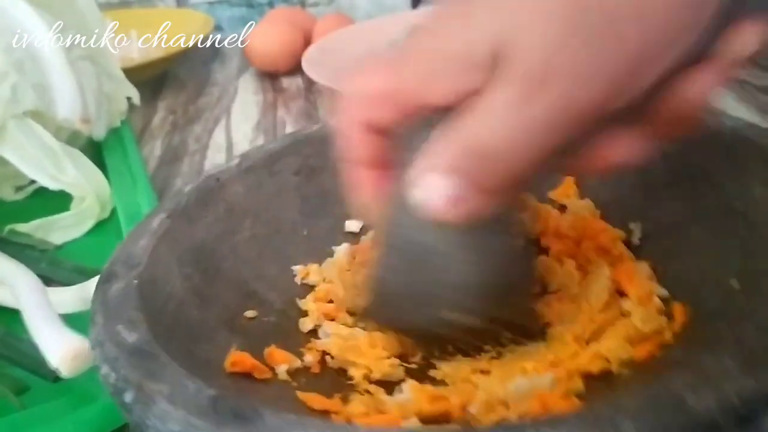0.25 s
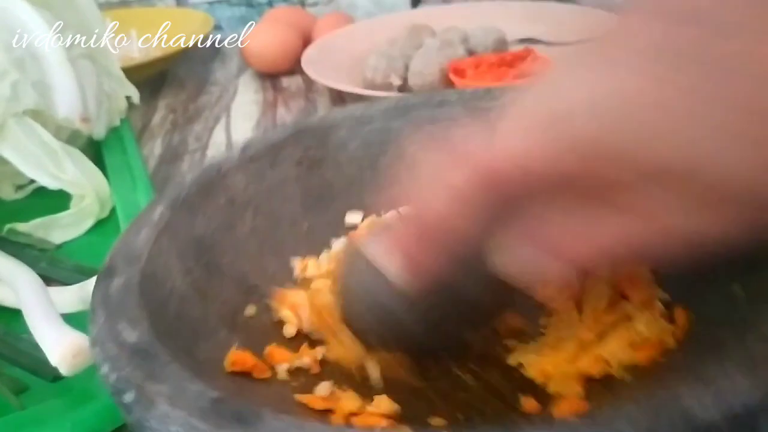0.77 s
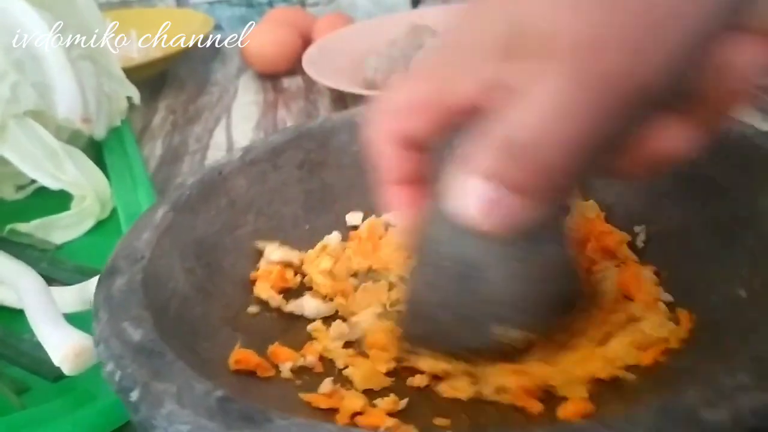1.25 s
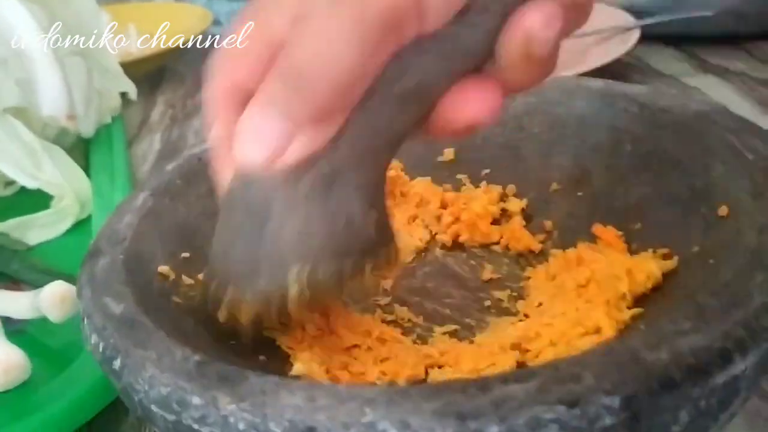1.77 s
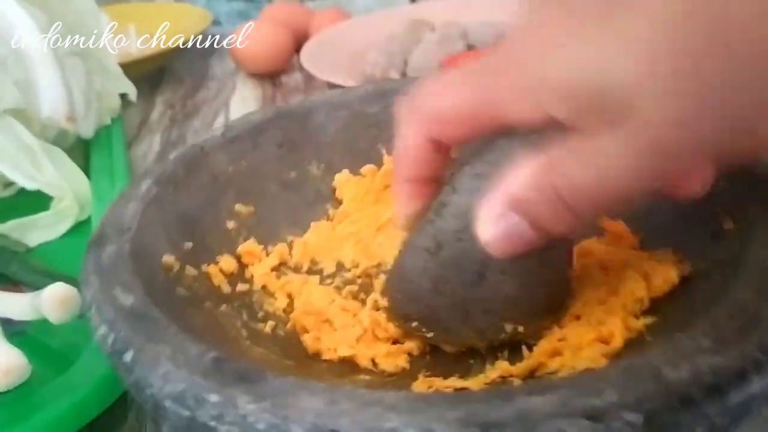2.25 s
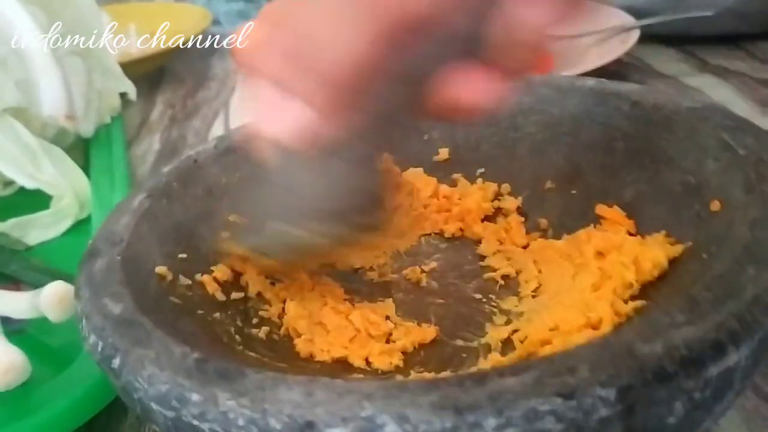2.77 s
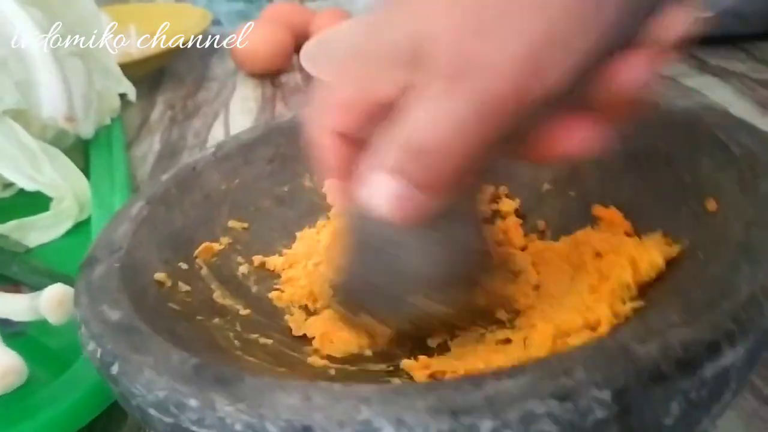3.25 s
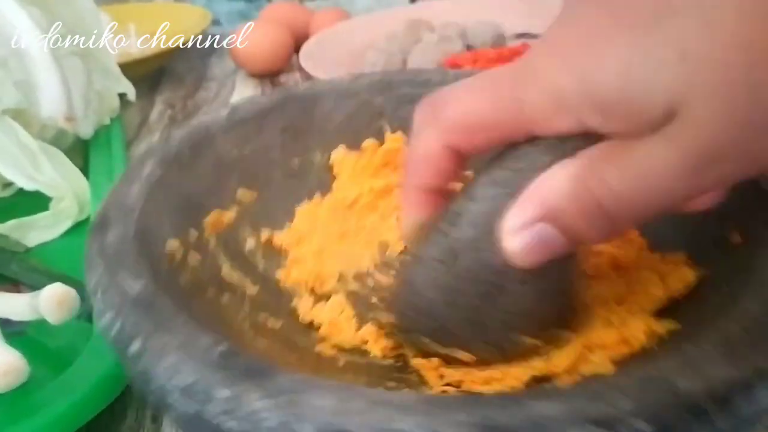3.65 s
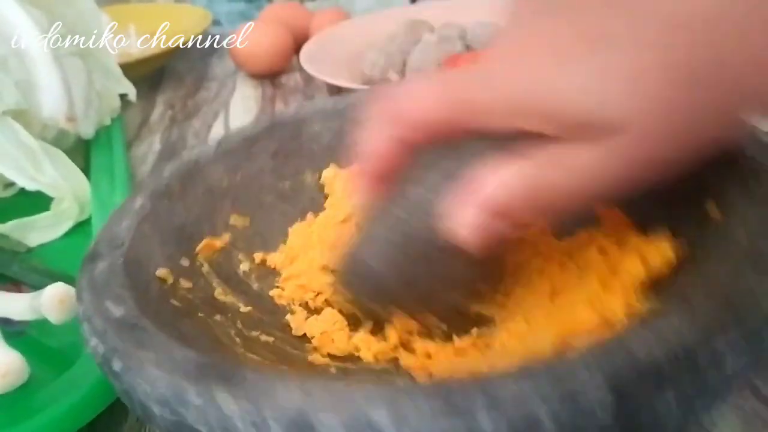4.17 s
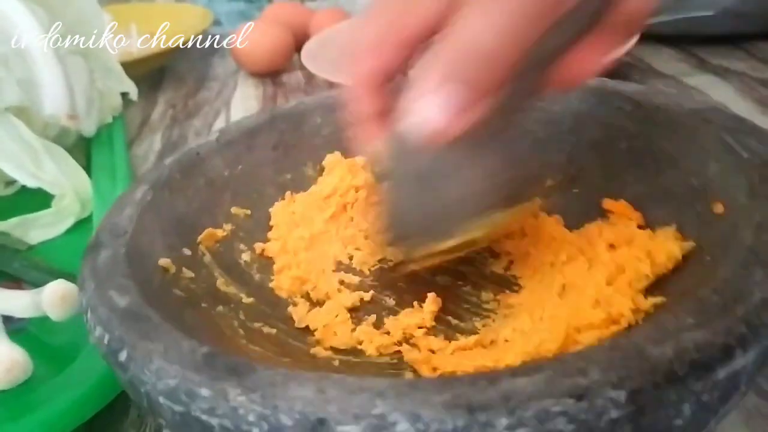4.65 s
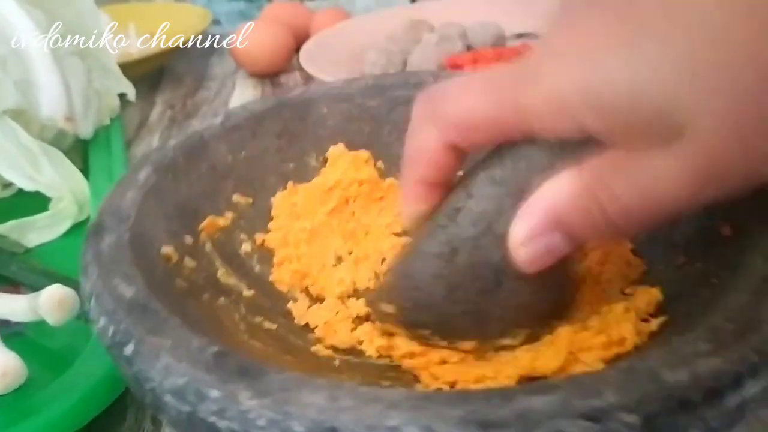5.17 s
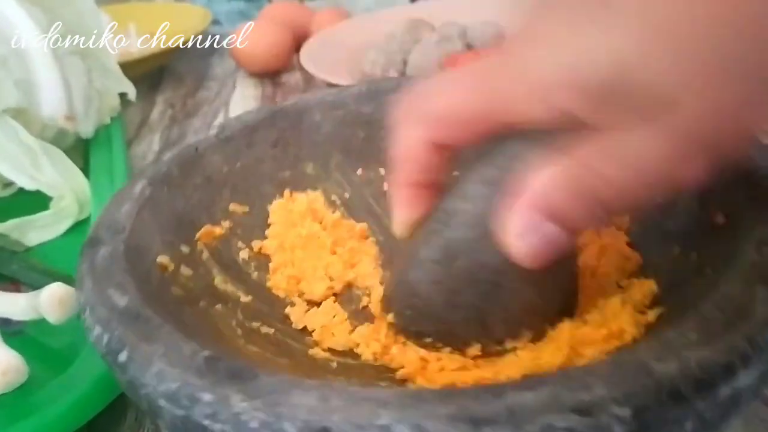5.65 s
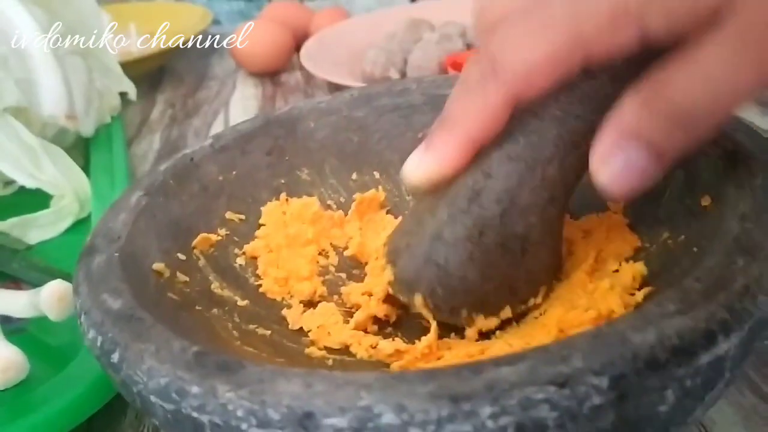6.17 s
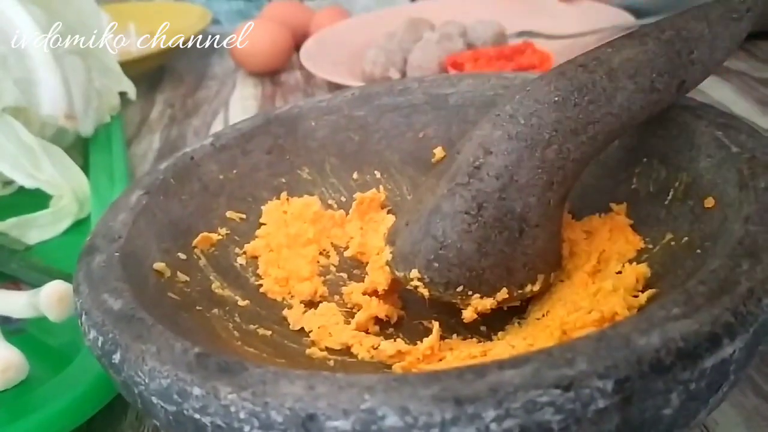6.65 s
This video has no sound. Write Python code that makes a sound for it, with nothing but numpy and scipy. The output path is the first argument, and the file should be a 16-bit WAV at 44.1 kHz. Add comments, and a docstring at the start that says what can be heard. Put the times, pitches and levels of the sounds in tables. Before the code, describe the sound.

A stone pestle grinds moist spice paste in a stone mortar, heard from close by in a kitchen. At the start a faint ring of the bowl fades as quick, grainy rasping strokes begin, several a second, dotted with crisp snaps of grit. The table rumbles and thuds softly beneath them. At about 0.7 seconds the pestle hits bare stone with a sharp, briefly ringing knock, and a faint low hum passes around 1 second. Lighter taps follow near 1.8 seconds. The scraping and crackling carry on unevenly, with dull bumps around 3 seconds. More sharp knocks land at about 3.9 and 5.4 seconds, each with a short echo from the hard walls, and a low table thump falls between them near 4.9. The strokes thin out by 6 seconds, and a last ringing knock at 6.2 dies away into faint rumble and hiss.

```python
"""A stone pestle grinds moist spice paste in a stone mortar on a kitchen table, close to two microphone ports.
At first a ring of the bowl fades over a faint hiss; friction makes the paste rasp, grit snaps and the
table thuds and rumbles. Around the first second a low hum passes and the pestle knocks on bare stone:
the bowl rings, and faint treble distortion tones follow the ring. Strokes and scattered knocks go on,
echoed by the hard kitchen walls, until a last knock just after six seconds dies away into the rumble."""
import sys
import numpy as np
from scipy import signal
from scipy.fft import rfft, irfft, next_fast_len
from scipy.io import wavfile
from scipy.ndimage import uniform_filter1d, map_coordinates

SR = 44100
rng = np.random.default_rng(int(sys.argv[2]) if len(sys.argv) > 2 else 0)


def bounce(signal):
    """Save signal as a 16-bit WAV file at the path given by the first command-line argument."""
    frames = np.transpose(np.atleast_2d(signal))
    limited = np.clip(frames, -1, 1)
    pcm = np.round(limited * 32767).astype(np.int16)
    wavfile.write(sys.argv[1], SR, pcm)


N = 305168


def amp(db):
    """Amplitude ratio of a level in decibels."""
    return 10 ** (np.asarray(db) / 20)


def unit(x):
    """Normalisation to an rms of 1."""
    return x / np.sqrt(np.mean(x ** 2) + 1e-20)


def along(points, hz):
    """Interpolation of (Hz, value) points on a logarithmic frequency axis."""
    freqs, values = np.transpose(points)
    return np.interp(np.log(hz + 1), np.log(freqs + 1), values)


def wobble(rate):
    """Smooth random modulation through rate knots a second."""
    knots = rng.standard_normal(int(N * rate / SR) + 4)
    return map_coordinates(knots, [np.arange(N) * rate / SR])


def filtered(x, response):
    """Linear filtering: the spectrum is multiplied by a frequency response."""
    size = next_fast_len(x.shape[-1] + 8192)
    return irfft(rfft(x, size) * response(np.fft.rfftfreq(size, 1 / SR)), size)[..., :x.shape[-1]]


def add(track, start, sound):
    """Superposition of a sound on a track, from start in seconds."""
    part = track[..., round(start * SR):][..., :sound.shape[-1]]
    part += sound[..., :part.shape[-1]]


def swells(peaks, levels, lengths, ends_db=-10, exponent=1.9, release_ratio=0.95):
    """Incoherent addition: the envelope of swells whose powers sum."""
    power, t = np.zeros(N), np.arange(N) / SR
    for peak, db, length in zip(peaks, levels, lengths):
        near = slice(max(0, round((peak - 2 * length) * SR)), round((peak + 2 * length) * SR))
        offset = (t[near] - peak) / (length / 2)
        distance = np.where(offset < 0, -offset, offset / release_ratio)
        power[near] += amp(db + ends_db * distance ** exponent) ** 2
    return np.sqrt(power)


# Each row: frequency in Hz, correlation between the ports.
COHERENCE = [(30, 0.53), (80, 1), (200, 0.9), (500, 0.4), (2000, 0.42), (8000, 0.034)]

def stereo_noise(spectrum, pair):
    """Partial coherence: two independent noises are coloured and blended into stereo of rms 1."""
    def response(hz):
        angle = np.arccos(np.clip(along(COHERENCE, hz), -1, 1)) / 2
        return amp(along(spectrum, hz)) * [np.cos(angle), np.sin(angle)]
    mid, side = filtered(pair, response)
    return unit(np.array([mid + side, mid - side]))


# Each row: frequency in Hz, relative spectral level in dB.
HISS_SPECTRUM = [(400, -32.5), (600, -1), (2000, -9), (5000, -15.5), (9500, -12.5), (12000, -23),
                 (16300, -28.5)]

def hiss(db=-65.5):
    """Stationary broadband noise forms a faint floor."""
    return amp(db) * stereo_noise(HISS_SPECTRUM, rng.standard_normal((2, N)))


# Each row: frequency in Hz, time of peak in seconds, level in dB, length in seconds.
HUM_TONES = [(48.4, .8, -52, .8), (95, .8, -60, 1), (339, 1.2, -56.5, 0.45)]

def hum():
    """Phase modulation makes low tones waver as they come and go."""
    t = np.arange(N) / SR
    return sum(swells([peak], [db], [length]) * np.sqrt(2) * np.sin(2 * np.pi * hz * t + .8 * wobble(14))
               for hz, peak, db, length in HUM_TONES)


# Each row: frequency in Hz, reverberation time (60 dB of decay) in seconds.
KITCHEN_T60 = [(300, 0.42), (1600, 0.95), (4000, 0.66), (10000, 0.44)]

def kitchen(x):
    """Reverberation: wall reflections build up, then each frequency decays at its own rate."""
    hz, t, noise = signal.stft(rng.standard_normal((2, SR)), SR, nperseg=256)
    decay = amp(-60 * t / along(KITCHEN_T60, hz)[:, None])
    tail = signal.istft(noise * decay * (1 - np.exp(-t / 0.032)), SR, nperseg=256)[1]
    return signal.fftconvolve(x[None], tail / np.linalg.norm(tail[0]), axes=1)


# Each row: time in seconds, then levels in dB of the sway, the board and its upper band.
RUMBLE_LEVELS = [(0.0, -50, -60, -56.5), (0.4, -50, -52.5, -56.5), (0.98, -54.5, -57, -55),
                 (1.41, -53.5, -52.5, -56.5), (1.66, -53.5, -55, -61), (2.33, -56.5, -63, -67),
                 (2.93, -55.5, -61.5, -64.5), (3.16, -53, -45, -50.5), (3.49, -55, -64, -63),
                 (4.07, -54, -57, -68.5), (4.57, -57.5, -61.5, -61), (4.87, -54.5, -56.5, -61),
                 (5.72, -55, -61.5, -63), (6.11, -58, -59, -63.5), (6.44, -59, -62, -63),
                 (6.92, -62, -61, -68)]
# Each row of these three: frequency in Hz, relative spectral level in dB.
SWAY_SPECTRUM = [(12, -31), (20, 2), (49, -7), (80, -9.5), (124, -19.5), (140, -26), (180, -51.5),
                 (310, -120)]
BOARD_SPECTRUM = [(76, -43.5), (130, -29.5), (156, -8.5), (210, -4.5), (247, -7), (300, -24), (390, -47.5),
                  (660, -120)]
UPPER_SPECTRUM = [(250, -35.5), (300, -1), (345, -1.5), (420, -2), (550, -5), (900, -24.5), (1500, -37)]

def table_rumble():
    """Forced vibration: the table sways and its board drones under the working hands."""
    def band(spectrum, levels, waver_db, rate):
        db = np.interp(np.arange(N) / SR, times, levels) + waver_db * wobble(rate)
        return amp(db) * stereo_noise(spectrum, rng.standard_normal((2, N)))
    times, sway_db, board_db, upper_db = np.transpose(RUMBLE_LEVELS)
    sway = band(SWAY_SPECTRUM, sway_db, waver_db=3.3, rate=16)
    board = band(BOARD_SPECTRUM, board_db, waver_db=3.3, rate=13)
    return sway + board + band(UPPER_SPECTRUM, upper_db, waver_db=1.4, rate=11)


# Each row: start in seconds, level in dB, frequency in Hz, cycles to decay by 30 dB.
ARM_PUSHES = [(0.691, -27, 96, 5.3), (1.6, -42, 78, 6.4), (2.029, -35.5, 90, 5.4), (2.274, -50, 72.7, 7.6),
              (2.649, -38.5, 91.7, 6.6), (2.926, -37, 80.7, 7.1), (3.178, -30, 117, 6.8),
              (3.367, -44, 80.7, 5), (3.668, -39, 65.2, 4.7), (3.89, -43, 89.7, 3.1), (4.149, -51, 56.5, 4),
              (4.479, -44, 101, 7.2), (4.899, -24, 95.6, 11.3), (5.1, -63.5, 44.2, 3.1),
              (5.464, -34, 86, 3.9), (5.752, -35, 91, 4.4), (6.178, -37, 65.7, 5)]

def table_shoves():
    """Damped oscillation: each push of the arms swings the table on its flexing legs."""
    out, t = np.zeros((2, N)), np.arange(SR // 3) / SR
    for start, db, hz, cycles in ARM_PUSHES:
        envelope = amp(db - 30 * t * hz / cycles) * (1 - np.exp(-t / 0.013))
        add(out, start, envelope * np.sin(2 * np.pi * hz * t))
    return out


# Each row: start in seconds, level in dB, frequency in Hz, relative rattle level in dB.
MORTAR_BUMPS = [(0.089, -39, 200, -10), (0.299, -38.5, 223, -19.5), (0.664, -23.5, 497, -4),
                (1.149, -42.5, 345, -9.5), (1.516, -35, 417, -6), (1.799, -38.5, 185, -4),
                (2.974, -37.5, 175, -2.5), (3.024, -37.5, 220, -8.5), (3.099, -47.5, 188, -10.5),
                (3.155, -30.5, 191, -2.5), (3.199, -30.5, 510, -17), (3.719, -44, 207.6, -15),
                (3.87, -20, 604, -6), (3.909, -29, 573, -3.5), (3.939, -37.5, 610, -8.5),
                (4.689, -46, 187.6, -14.5), (4.759, -45, 207, -18.5), (4.959, -34.5, 198, -8),
                (5.44, -22.5, 558, -8.5), (5.969, -41.5, 201, -21), (6.164, -36, 496, -3)]

def table_thuds():
    """Impact excitation: the rocking mortar bumps the board, which swings with a dull rattle."""
    out, t = np.zeros((2, N)), np.arange(SR // 3) / SR
    rattle_spectrum = [(150, -14.0), (300, -3.5), (600, -0.5), (1300, -13.5), (2500, -22.0)]
    for start, db, hz, rattle_db in MORTAR_BUMPS:
        swing = np.sin(2 * np.pi * hz * t) * amp(-60 * t * hz / 25)  # 60 dB down in 25 cycles
        noise = stereo_noise(rattle_spectrum, rng.standard_normal((2, len(t))))
        rattle = amp(rattle_db - 60 * t / 0.14) * noise
        add(out, start, amp(db) * (swing + rattle) * (1 - np.exp(-t / 0.00053)))
    return out


# Each row: start in seconds, level in dB, relative body level in dB.
FRACTURES = [(0.0713, -40.5, -18), (0.2413, -30, -27.5), (0.3526, -37.5, -23), (0.663, -27, -19),
             (0.8315, -27.5, -10), (1.0953, -26, -5), (1.292, -33.5, -22), (1.777, -36, -11),
             (2.031, -31.5, -28), (2.1029, -32.5, -21), (2.2792, -35.5, -10), (2.312, -26.5, -32),
             (2.4025, -26.5, -34), (2.4079, -36, -35), (2.584, -32, -13), (2.6713, -35, -18),
             (2.86, -35.5, -17.5), (3.3071, -35, -33), (3.3699, -25, -12.5), (3.609, -29.5, -34),
             (3.703, -32.5, -32.5), (3.869, -29, -20.5), (4.5336, -38.5, -10.5), (4.9902, -37, -19.5),
             (5.1691, -40, -24), (5.439, -25, -19.5), (5.5349, -33.5, -5.5), (5.576, -28, -10),
             (5.6605, -37, -2), (6.131, -46.5, -21), (6.163, -28, -19)]
# Each row: frequency in Hz, relative spectral level in dB.
BURST_SPECTRUM = [(1500, -29), (3500, -16.5), (6000, -8), (9000, 0), (11500, -5), (12500, -11.5),
                  (16300, -20.5)]

def grit_snaps(rise_s=.0004, t60_s=.014):
    """Brittle fracture: a hard grain gives way with a bright burst, a duller body and a short crumble."""
    out, t = np.zeros((2, N)), np.arange(SR // 16) / SR
    body_spectrum = [(600, -36.5), (1100, -3.5), (4200, -3), (6500, -19.5)]
    crumble = amp(-17 - 60 * t / 0.14)
    envelope = (amp(-60 * t / t60_s) + crumble) * (1 - np.exp(-t / rise_s))
    for start, db, body_db in FRACTURES:
        burst = stereo_noise(BURST_SPECTRUM, rng.standard_normal((2, len(t))))
        body = stereo_noise(body_spectrum, rng.standard_normal((2, len(t))))
        add(out, start, amp(db) * (burst + amp(body_db) * body) * envelope)
    return out * amp([[-1.5], [1.5]])  # louder on the right


# Each row: frequency in Hz, level in dB relative to the main ring.
DISTORTION_TONES = [(7467, -52), (8091, -54), (9405, -39), (10050, -45), (10710, -50), (11360, -49),
                    (12650, -48), (13290, -39), (13940, -43), (14600, -46), (15255, -46)]

def distortion_tones(knocks):
    """Amplitude modulation: faint treble distortion tones follow the envelope of loud rings."""
    main_ring = filtered(knocks, lambda hz: np.exp(-((hz - RING_TONES_HZ[0]) / 150) ** 2))
    t = np.arange(N) / SR
    tones = sum(amp(db) * np.sin(2 * np.pi * (hz * t + rng.random())) for hz, db in DISTORTION_TONES)
    return np.abs(signal.hilbert(main_ring)) * tones


# Each row: time of peak in seconds, level in dB, length in seconds, frequency in Hz.
RING_SWELLS = [(0, -41, 0.16, 1618), (0.113, -50.5, .08, 1614), (0.215, -52, 0.11, 1620),
               (0.41, -57.5, 0.13, 1630), (1.38, -54, 0.19, 882), (1.573, -54, 0.13, 1100),
               (1.598, -54, .14, 1630), (1.713, -57, 0.11, 1615), (2.832, -54, 0.12, 1607),
               (3.043, -64, 0.15, 1656), (3.073, -54, .06, 1000), (5.194, -56.5, 0.054, 1624)]

def bowl_resonance(half_width_hz=31):
    """Narrow-band resonance: the bowl's ring fades at the opening, then swells faintly; a few dragging strokes
    add faint narrow tones near 1 kHz."""
    t = np.arange(N) / SR
    slow = filtered(rng.standard_normal((2, 2, N)), lambda hz: 1 / (1 + (hz / half_width_hz) ** 2))
    in_phase, quadrature = unit(slow)
    out = np.zeros((2, N))
    for peak, db, length, hz in RING_SWELLS:
        band = in_phase * np.cos(2 * np.pi * hz * t) + quadrature * np.sin(2 * np.pi * hz * t)
        out += swells([peak], [db], [length]) * band
    return out


# Each entry: frequency in Hz of a tone heard in each knock's ring.
RING_TONES_HZ = [1624, 2270, 2615, 3708, 5515, 6130]
# Each row, one per ring tone: relative level in dB, 60 dB decay time in seconds.
RING_DECAYS = [(-2.5, 0.11), (-30, 0.14), (-39, .1), (-13, 0.072), (-29.5, 0.35), (-23, 0.15)]
# Brief high tones at a knock's start. Each row: frequency in Hz, level in dB, 60 dB decay in seconds.
SHORT_HIGH_TONES = [(4850, 0, .035), (6840, -6, .03)]
# Air and paste in the bowl: frequency in Hz, 60 dB decay time in seconds.
CAVITY_MODE = (1050, .04)
# Each row: frequency in Hz, relative spectral level in dB.
CONTACT_SPECTRUM = [(200, -16.5), (450, -11.5), (700, -4.5), (1100, 5), (1900, 4), (2800, 4), (3400, -10.5),
                    (4200, -14.5), (8000, -24.5), (16000, -33.5)]
# Each row: start in seconds, level in dB, then gains in dB of the fourth ring tone, top two ring tones, # brief
# high tones, click, crack and cavity, and last the pan to the left in dB.
BLOWS = [(0.6622, -2, -2, -4, -6, -28, 3.5, -14.5, -6.5), (0.676, -24, 10.5, 0, -19, -20.5, 8.5, -9, 2.5),
         (1.5249, -52, 13.5, 20, -7, 11, 1, 12, -3.5), (1.7771, -20.5, 3.5, 0.5, -9, -41, -8, -8.5, 4.5),
         (1.8433, -36.5, 6, 16, -1.5, -15.5, 7.5, 2, 6), (3.8684, -2, -1.5, 1, -29, -36, -4.5, -21.5, 4.5),
         (4.7091, -42, -5, 14.5, -20.5, 18, -25, -28.5, -5.5),
         (5.437, -3, 7, 0.5, -28, -32.5, -2, -24.5, -5),
         (6.1621, -4.5, -2.5, -2.5, -52.5, -28.5, -4.5, -46, -8)]

def pestle_knocks(rise_s=0.0004):
    """Damped free vibration: stone strikes stone with a click and a crack, and the ring decays."""
    out, t = np.zeros((2, N)), np.arange(SR // 3) / SR
    rim_shadow = lambda hz: amp(along([(1700, 3), (2500, -6), (6000, -3.5), (12000, -7)], hz))
    def tone(hz, db, t60):
        drift = (hz / 13000) ** 3 * np.cumsum(rng.standard_normal(len(t)))  # blurs the high tones
        return amp(db - 60 * t / t60) * np.sin(2 * np.pi * hz * t + drift)
    for start, db, fourth_db, top_db, short_high_db, click_db, crack_db, cavity_db, pan_db in BLOWS:
        short_high = sum(tone(hz, level + short_high_db, t60) for hz, level, t60 in SHORT_HIGH_TONES)
        ring = tone(CAVITY_MODE[0], cavity_db, CAVITY_MODE[1])
        gains = [0, 0, 0, fourth_db, top_db, top_db]  # each blow has its own timbre
        for hz, (level, t60), gain_db in zip(RING_TONES_HZ, RING_DECAYS, gains):
            ring += tone(hz, level + gain_db, t60)
        contact = unit(filtered(rng.standard_normal(len(t)), lambda hz: amp(along(CONTACT_SPECTRUM, hz))))
        crack = amp(crack_db) * contact * (amp(-60 * t / 0.0079) + amp(-21.5 - 60 * t / 0.18))
        click = amp(click_db - 60 * t / 0.0074) * unit(np.diff(rng.standard_normal(len(t) + 1)))
        attack = amp(db) * (1 - np.exp(-t / rise_s))
        blow = attack * (ring + crack + click + short_high)
        left = filtered(np.roll(blow, 3), rim_shadow)  # this port is farther off, behind the rim
        add(out, start, np.array([left * amp(pan_db / 2), blow * amp(-pan_db / 2)]))
        add(out, start, amp(-9.5) * kitchen(attack * (ring + crack + click)))  # the brief high tones stay dry
    return out


def paste_lumps(x, depth_db):
    """Spectral modulation: lumps of paste vary the gain in patches of frequency and time."""
    spectrum = signal.stft(x, nperseg=256)[2]
    patches = uniform_filter1d(rng.standard_normal(spectrum.shape[1:]), size=7, axis=0)
    patches = uniform_filter1d(patches, size=9, axis=1)
    return signal.istft(spectrum * amp(depth_db * unit(patches)), nperseg=256)[1][:, :N]


# Each row: frequency in Hz, relative spectral level in dB.
RUB_SPECTRUM = [(350, -33), (600, -13.5), (859, -11.5), (1010, -9.5), (1370, -14.5), (2940, -14),
                (3820, -9.5), (5950, -9.5), (9510, 0), (11200, -4), (12200, -13), (15200, -15),
                (16300, -39.5)]
# Each row: frequency in Hz, left minus right level in dB.
RUB_BALANCE = [(60, -6), (110, -5.5), (200, -3), (380, 0.5), (700, -2.5), (1290, -2.5), (2380, -1.5),
               (4400, -1), (8120, -4), (15000, 0.5)]
# Each row: time of most pressure in seconds, level in dB, length in seconds, coarseness in dB.
PESTLE_STROKES = [(0.019, -48, 0.18, 3.5), (.135, -38, 0.11, 0.5), (.27, -41.5, 0.16, 0),
                  (0.43, -39, 0.16, -0.5), (0.774, -43, 0.17, 4), (0.934, -41.5, 0.13, 4.5),
                  (1.004, -46.5, 0.12, -2), (1.103, -45, 0.09, 3), (1.207, -46, 0.095, 3.5),
                  (1.291, -47, 0.11, 2), (1.423, -46, 0.17, 2), (1.552, -43, 0.07, 1.5),
                  (1.629, -41.5, 0.072, -3), (1.853, -40.5, 0.029, 5), (1.953, -41, 0.15, -1.5),
                  (2.133, -41, 0.078, 3), (2.202, -45, 0.071, 0), (2.308, -42.5, 0.11, 2.5),
                  (2.428, -44, .1, 2), (2.504, -46, 0.11, -1.5), (2.615, -43.5, 0.14, -1.5),
                  (2.901, -45, 0.17, 2.5), (3.028, -40.5, 0.12, -1), (3.191, -45, .14, 2),
                  (3.34, -41.5, 0.095, 0), (3.479, -42.5, 0.16, -1.5), (3.63, -42, 0.08, 1.5),
                  (3.71, -47, 0.11, -8.5), (3.901, -48.5, 0.045, -2), (4, -45, 0.17, 2),
                  (4.139, -41, 0.097, 1.5), (4.297, -41.5, 0.12, 0), (4.455, -43, 0.12, 1),
                  (4.858, -43, 0.16, 1.5), (5.036, -43.5, .12, 0.5), (5.195, -43.5, 0.11, 2),
                  (5.28, -49.5, 0.12, -6.5), (5.542, -46.5, 0.16, -5), (5.694, -45, 0.18, 0),
                  (5.859, -49, 0.13, 1), (6.025, -65, 0.33, 0)]

def grinding(grains_per_s=1500, flutter_db=1.6):
    """Friction noise: paste sheared on rough stone gives a grainy hiss that grows with pressure."""
    peaks, db, lengths, coarse_db = np.transpose(PESTLE_STROKES)
    grains = (rng.random((2, N)) < grains_per_s / SR) * rng.standard_normal((2, N))
    friction = paste_lumps(rng.standard_normal((2, N)) + 1.2 * unit(grains), depth_db=2)
    balance = lambda hz: amp(np.outer([.5, -.5], along(RUB_BALANCE, hz)))
    rub = filtered(stereo_noise(RUB_SPECTRUM, friction), balance)
    dull = filtered(rub, lambda hz: 1 / (1 + (hz / 6500) ** 6))
    fine = swells(peaks, db, lengths) * (rub - dull)
    coarse = swells(peaks, db + coarse_db, lengths) * dull  # coarser lumps raise the lower band
    return amp(flutter_db * wobble(40)) * (fine + coarse)


def scene():
    """Superposition of direct and reverberant sound at the two ports."""
    knocks = pestle_knocks()
    work = grinding() + grit_snaps() + table_thuds()
    background = hiss()
    distortion = distortion_tones(knocks)
    ring = bowl_resonance()
    room = amp(-6.5) * kitchen(work.mean(0))[:, :N]
    return background + room + table_shoves() + table_rumble() + hum() + distortion + ring + knocks + work


def record(dry, ceiling=.95, top_hz=16300):
    """Soft saturation rounds the loudest peaks; a low-pass filter limits the band."""
    saturated = dry / (1 + np.abs(dry / ceiling) ** 6) ** (1 / 6)
    return filtered(saturated, lambda hz: hz < top_hz)


dry = scene()
out = record(dry)
bounce(out)
```